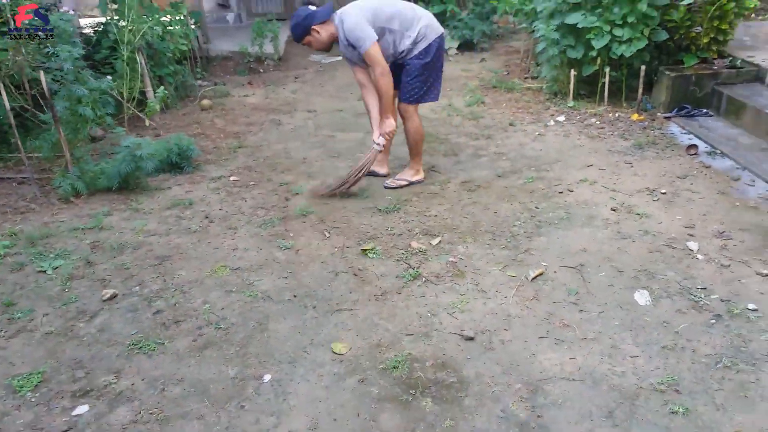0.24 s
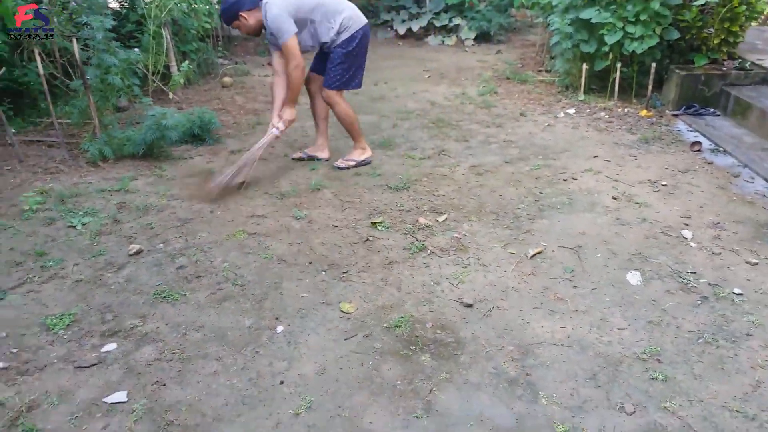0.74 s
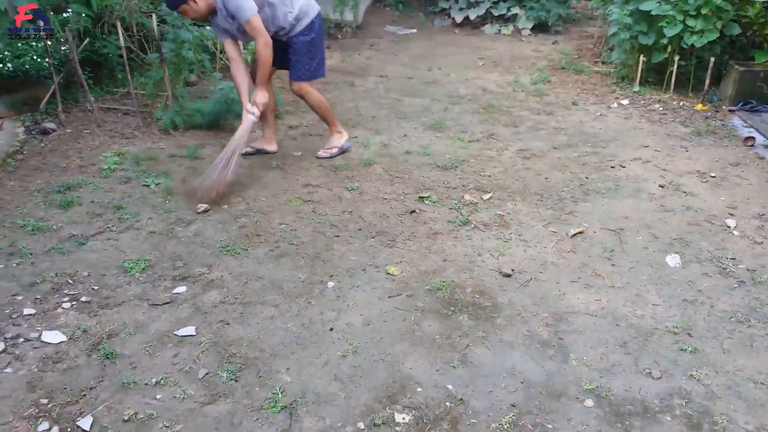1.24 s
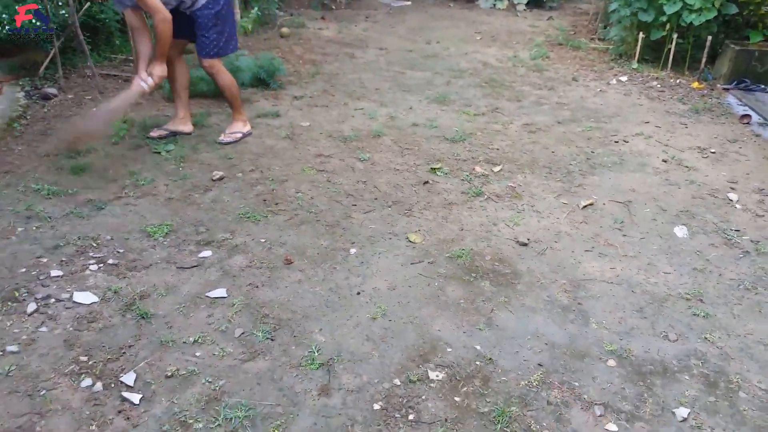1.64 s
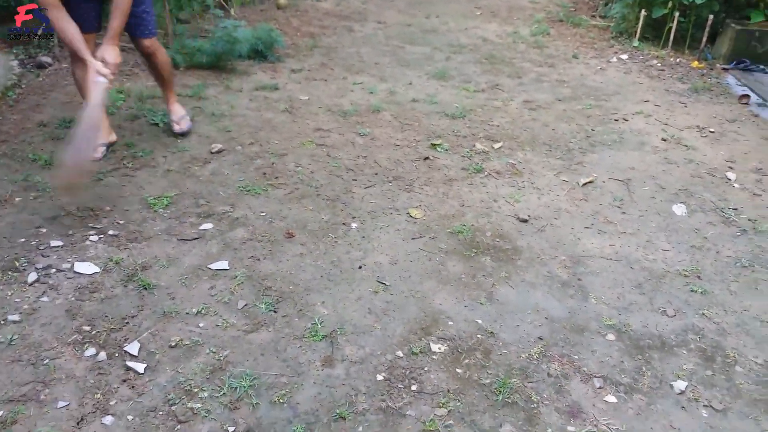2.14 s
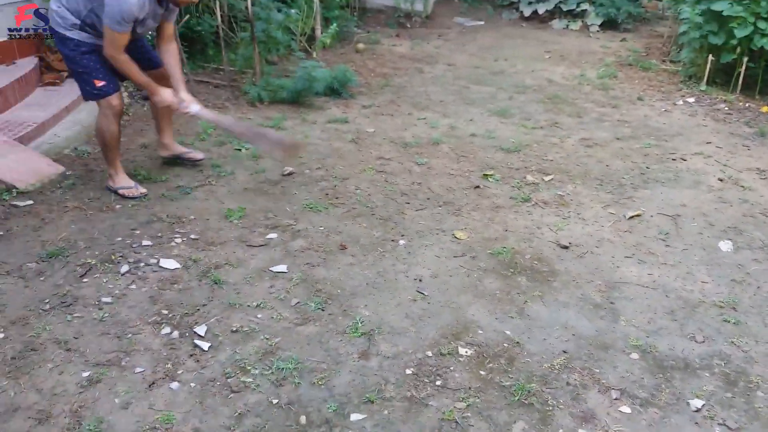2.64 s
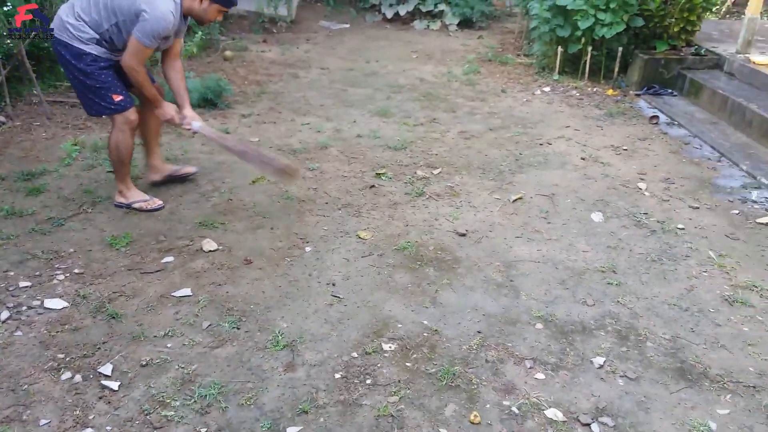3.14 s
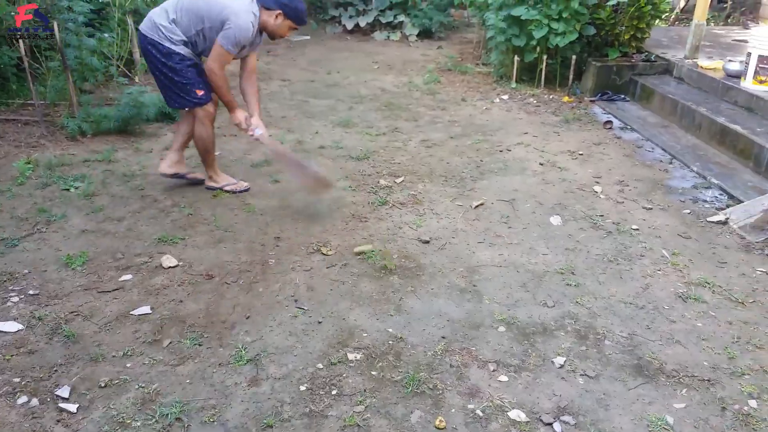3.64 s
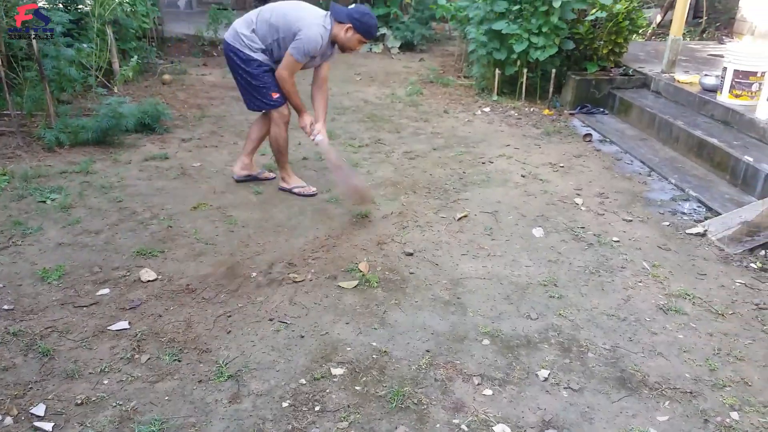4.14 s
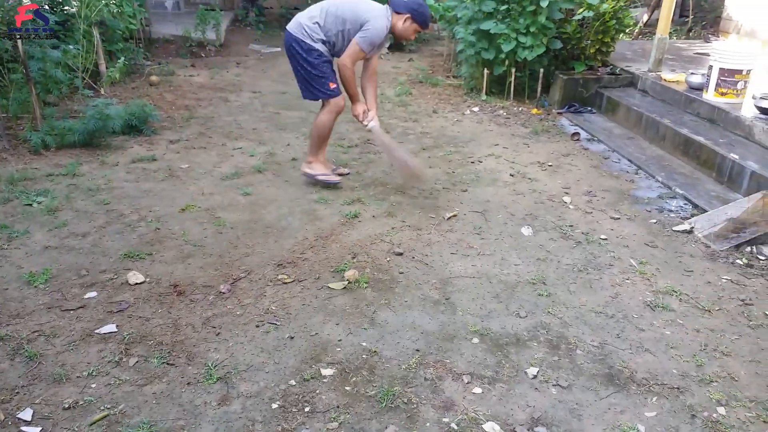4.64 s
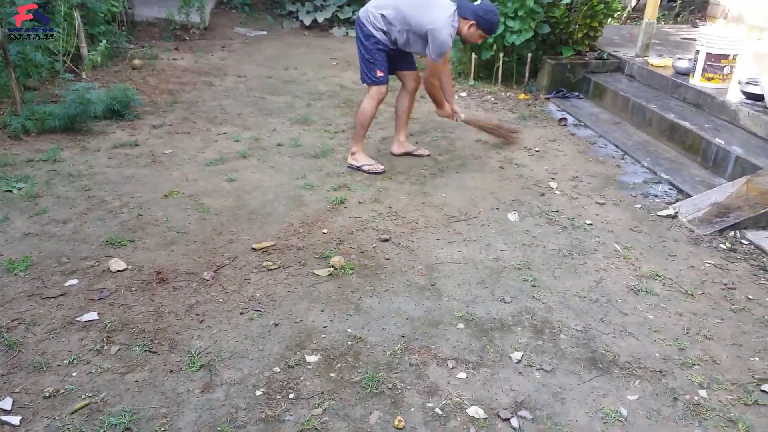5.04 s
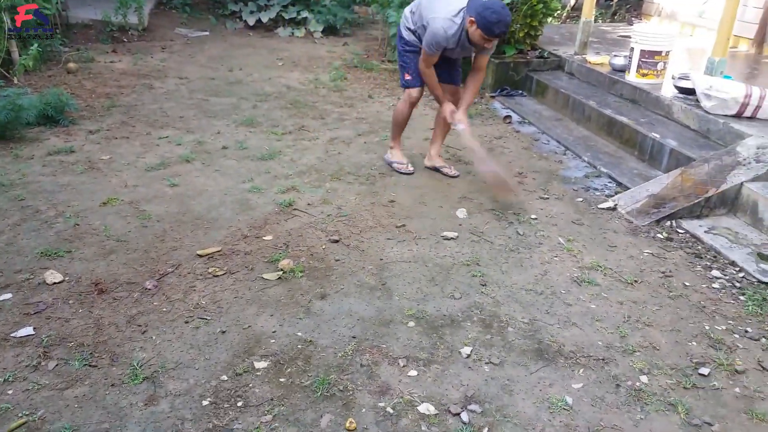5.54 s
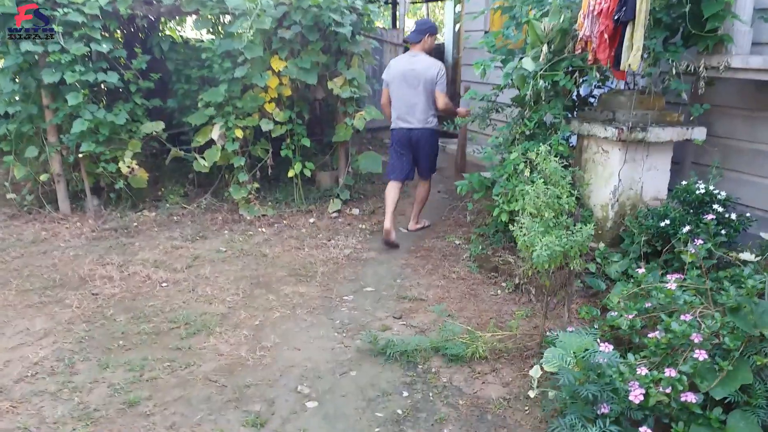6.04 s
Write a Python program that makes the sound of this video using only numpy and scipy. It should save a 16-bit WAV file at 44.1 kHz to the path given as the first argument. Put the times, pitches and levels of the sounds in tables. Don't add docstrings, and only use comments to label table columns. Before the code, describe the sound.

Outdoors in a dirt yard, a stiff twig broom sweeps in rapid, time-lapsed strokes, about six dry scratchy swishes each second, chopped into tiny jittery slices that flip between left and right. Small stones click and ring, a few dull knocks and footfalls thud. Faint traffic rumble and insects lie beneath. Near the end the sweeping stops dead, leaving quiet air and insect song.

```python
import sys
import numpy as np
from scipy import signal
from scipy.fft import rfft, irfft, next_fast_len
from scipy.io import wavfile
from scipy.ndimage import uniform_filter1d

SR = 44100
rng = np.random.default_rng(int(sys.argv[2]) if len(sys.argv) > 2 else 0)


def how_loud(loudness_db):
    steps = np.asarray(loudness_db, float) / 20
    return 10 ** steps


def wrap_up_sound(samples):
    columns = np.atleast_2d(samples).T
    tamed = np.clip(columns, -1, 1)
    steps = np.round(tamed * 32767).astype(np.int16)
    wavfile.write(sys.argv[1], SR, steps)


N = 276948

SLICE_S, FIRST_CUT_S = 1508.3 / SR, 140 / SR


def in_time(rows):
    return np.interp(np.arange(N) / SR, *np.transpose(rows))


def butter(x, order, hz, kind="low"):
    return signal.sosfilt(signal.butter(order, hz, kind, fs=SR, output="sos"), x)


def colour(x, points):
    size = next_fast_len(N + 4096)
    hz, db = np.transpose(points)
    log_hz = np.log(np.maximum(np.arange(size // 2 + 1) * SR / size, 1))
    level_db = np.interp(log_hz, np.log([hz[0] / 4, *hz]), [db[0] - 14.5, *db])
    cepstrum = irfft(level_db * np.log(10) / 20, size)
    cepstrum[1:size // 2] *= 2
    cepstrum[size // 2 + 1:] = 0
    return irfft(rfft(x, size) * np.exp(rfft(cepstrum)), size)[..., :N]


def resonance(x, hz, width_hz):
    r = np.exp(-np.pi * width_hz / SR)
    zeros = [(1 - r * r) / 2, 0, (r * r - 1) / 2]
    poles = [1, -2 * r * np.cos(2 * np.pi * hz / SR), r * r]
    return signal.lfilter(zeros, poles, x)


def rms_one(x):
    return x / np.sqrt(np.mean(x ** 2) + 1e-20)


def drift(rate_hz):
    r = np.exp(-2 * np.pi * rate_hz / SR)
    noise = rng.standard_normal(N + 9000)
    return rms_one(signal.lfilter([1], [1, -2 * r, r * r], noise)[9000:])


def slice_place():
    return np.maximum(np.arange(N) / SR - FIRST_CUT_S, 0) / SLICE_S


def near_is_left():
    swaps_per_slice = .42475
    k = slice_place().astype(int)
    return (np.floor(k * swaps_per_slice + .034) % 2 == 1) | (k > 168)


def swing(t):
    # sticks land in s, drag lasts in s,
    # strength in dB, thrown dust in dB, bundle turned side-on in dB
    strokes = [(-0.042, 0.13, -21, -51, 4.1), (0.137, 0.12, -21.5, -37.9, 5.5),
               (0.319, 0.087, -19, -44.2, 6.0), (0.48, 0.065, -20, -34, 4.5),
               (0.631, 0.075, -18.5, -38.5, 0.5), (0.791, 0.081, -18.5, -33, 4.5),
               (0.957, 0.092, -16, -41, 2.5), (1.123, 0.059, -14.5, -36, 3),
               (1.287, 0.07, -16.8, -30.5, 3.5), (1.464, 0.079, -17, -41, 2.7),
               (1.649, 0.096, -19.0, -44, 2.5), (1.823, 0.073, -18, -43, 3.5),
               (1.987, 0.084, -18.6, -53.5, 2.5), (2.157, 0.066, -17.5, -58, 0.5),
               (2.305, 0.042, -20, -38.7, 1), (2.467, 0.1, -19, -41, 0.5),
                 (2.643, 0.064, -16.5, -34.5, 1.7), (2.791, 0.061, -15.5, -39.5, 1.8),
                 (2.96, 0.088, -22.5, -32.2, 3), (3.131, 0.067, -19.5, -36.5, 3.5),
                 (3.308, 0.087, -22.5, -41, 3.5), (3.476, 0.071, -22, -40.5, 0.7),
                 (3.631, 0.081, -22, -36.5, 2.5), (3.799, 0.087, -18.5, -34.4, 1),
                 (3.983, 0.062, -19.5, -35.5, 3), (4.143, 0.084, -21, -35.5, 5),
                 (4.33, 0.069, -21, -38, 5.2), (4.502, 0.063, -21.5, -35, 4.5),
                 (4.664, 0.072, -22.5, -42, 4.3), (4.818, 0.06, -17.5, -35.5, 5),
                 (4.988, 0.069, -22.5, -36, 6.5), (5.157, 0.066, -21.5, -39.5, 3.9),
                 (5.328, 0.07, -19, -37, 4.0), (5.512, 0.049, -16, -36.5, 4),
                 (5.706, 0.064, -18.5, -36.5, 2)]
    land_db_per_s, lift_db_per_s = 1313, 598
    arch_db, crest = 20.5, 0.43
    dust_lag_s, dust_rise_db_per_s, dust_fall_db_per_s = .034, 478, 196
    power, turn = np.full(len(t), 1e-9), np.zeros(len(t))
    for land, drag, strength_db, dust_db, turn_db in strokes:
        lift = land + drag
        sticks_db = strength_db - arch_db * ((np.clip(t, land, lift) - land) / drag - crest) ** 2
        sticks_db -= land_db_per_s * np.maximum(land - t, 0)
        sticks_db -= lift_db_per_s * np.maximum(t - lift, 0)
        after = t - lift - dust_lag_s
        fall_db = dust_fall_db_per_s * np.maximum(after, 0)
        rise_db = dust_rise_db_per_s * np.minimum(after, 0)
        power += how_loud(sticks_db) ** 2 + how_loud(dust_db - fall_db + rise_db) ** 2
        turn[t > land - SLICE_S] = turn_db
    return 10 * np.log10(power), turn


def clicks(per_s, spread_db):
    size_db = spread_db * np.minimum(rng.exponential(1, (3, N)), 4)
    sizes = how_loud(size_db) * rng.choice([-1, 1], (3, N))
    return rms_one(sizes * (rng.random((3, N)) < per_s / SR))


def patchy(x, held_db, moving_db):
    k = slice_place().astype(int)
    edges_hz = 400 * 2 ** np.arange(0, 5.6, 1 / 3)
    out = 0
    for i, (low, high) in enumerate(zip(edges_hz, edges_hz[1:])):
        held = held_db * rng.standard_normal(k[-1] + 1)[k]
        gain = how_loud(held + moving_db * drift(57))
        out = out + gain * butter(x, 2, [low, high], "band") * (-1) ** i
    return out


def broom(clump_db=0.27, snap_db=-7):
    # frequency in Hz, level in dB
    near_port = [(600, -9), (1000, -3.5), (1400, 0.34), (1700, 5.5), (2000, 6), (2600, 9.5), (3000, 9),
                 (4000, 17), (4500, 19), (5200, 11.5), (6300, 1.46), (7500, 1), (9000, -14), (15500, -33.5)]
    # frequency in Hz, level in dB
    far_port = [(600, -9.5), (1000, -4), (1400, -6.5), (1800, -3), (2300, -6), (2800, -6), (4000, -14),
                (5200, -20.5), (7000, -18.5), (9000, -26.5), (15500, -29)]
    # time in s, level in dB
    sheen = [(0, 1.5), (2, 1), (3.5, 3), (5.3, 3), (5.6, 7.5)]
    kept = 0.16
    fade_lag_s = 0.0025
    last_slice = 170
    far_db, far_follows, sheen_follows = -.5, 0.49, 0.41

    place = np.maximum(slice_place() - fade_lag_s / SLICE_S, 0)[::8]
    moment = np.floor(place) + .5 + kept * (place % 1 - .5)
    motion = swing(FIRST_CUT_S + fade_lag_s + moment * SLICE_S)
    level_db, body_db = np.repeat(motion, 8, axis=1)[:, :N]
    level_db[np.repeat(place, 8)[:N] >= last_slice] = -90

    slips = clicks(9000.0, spread_db=3.0) * how_loud(clump_db * drift(186))
    slips = slips + how_loud(snap_db) * clicks(350.0, spread_db=1.5)
    own = butter(slips[1:], 1, 1200, "high")
    near, far = patchy(0.58 * slips[0] + own, held_db=1.03, moving_db=1.45)
    ports = np.array([colour(near, near_port), colour(far, far_port)])
    ports /= np.std(ports[0])
    ports[0] += (how_loud(body_db) - 1) * butter(ports[0], 2, 2000)
    ports[1] *= how_loud(far_db + far_follows * body_db)
    sheen_db = in_time(sheen) + sheen_follows * body_db
    top = signal.sosfiltfilt(signal.butter(3, 8300, "high", fs=SR, output="sos"), ports)
    ports += (how_loud(sheen_db) - 1) * top
    ports *= uniform_filter1d(np.where(near_is_left(), 1., -1.), size=3)
    return uniform_filter1d(how_loud(level_db + 0.5), size=200) * ports


def yard():
    # time in s, level in dB
    rumble_level = [(0, -51), (.4, -53.5), (1.3, -50.5), (3.2, -52.5), (4.2, -50.5), (6.28, -52)]
    # frequency in Hz, density in dB per Hz
    traffic = [(15, -34), (25, -6), (44, -7.5), (102, 0.5), (195, -3.5), (372, -4.5), (600, -15.5),
               (900, -15), (1170, -41), (1980, -120)]
    # frequency in Hz, level in dB
    air_near = [(500, -8.5), (1000, -10), (2000, -11), (3000, -11.5), (4200, -6), (5500, -24),
                (7000, -18.5), (9000, -29), (15500, -27.5)]
    # frequency in Hz, level in dB
    air_far = [(500, -16.5), (1000, -12.5), (2000, -14.5), (3000, -13.5), (4200, -24), (5500, -22),
               (7000, -25), (9000, -26.5), (15500, -32)]
    # time in s, level in dB
    air_level = [(0, -45), (1, -44), (2, -47), (5, -48), (6.28, -46.5)]
    # start in s, end in s, centre in Hz, width in Hz, level in dB
    insects = [
        (-.1, 5.82, 8230, 220, -57),
        (5.82, 6.4, 8250, 180, -63.5),
        (5.84, 6.4, 9800, 1800, -68),
        (.42, .51, 9750, 500, -59),
        (.925, 1.05, 9750, 500, -58),
        (1.71, 1.73, 9750, 500, -60),
        (6.1, 6.4, 4154, 660, -52.5),
        (6.14, 6.4, 4770, 300, -57),
        (6.17, 6.4, 3250, 250, -60),
    ]
    song_edge_db_per_s, insect_far_db = 600, -12

    common, own = rng.standard_normal(N), rng.standard_normal((2, N))
    rumble = rms_one(colour(common + .7 * own, traffic + [(2500, -70)]))
    rumble *= how_loud(in_time(rumble_level) + 1.3 * drift(10))
    hiss = rng.standard_normal((2, N))
    air = np.array([colour(hiss[0], air_near), colour(hiss[1], air_far)])
    air *= how_loud(in_time(air_level) + 12 + .8 * drift(12))
    out = rumble + air
    t = np.arange(N) / SR
    for start, end, hz, width_hz, db in insects:
        band = resonance(resonance(rng.standard_normal((2, N)), hz, width_hz), hz, width_hz)
        outside_s = np.maximum(np.maximum(start - t, t - end), 0)
        song_db = db - song_edge_db_per_s * outside_s + 1.4 * drift(33)
        out += rms_one(band) * how_loud(song_db) * how_loud([[0], [insect_far_db]])
    return out


def motor():
    # time in s, level in dB
    hum = [(0, -59), (1.3, -60.5), (1.4, -93)]
    tone = resonance(resonance(rng.standard_normal(N), 388, 25), 388, 25)
    return rms_one(tone) * how_loud(in_time(hum))


def bird():
    # start in s, length in s, start pitch in Hz, end pitch in Hz, level in dB
    chirps = [
        (1.068, .034, 3700, 2850, -36),
        (5.581, .033, 7050, 6850, -41),
        (.452, .032, 1780, 1780, -45),
        (.42, .03, 1770, 1770, -52),
    ]
    out = np.zeros(N)
    for s, length, hz, end_hz, db in chirps:
        t = np.arange(round(length * SR)) / SR
        flutter = 1 + 0.2 * np.sin(2 * np.pi * 190 * t)
        mean_hz = hz + (end_hz - hz) * t / length / 2
        out[round(s * SR):][:len(t)] += how_loud(db) * flutter * np.sin(2 * np.pi * mean_hz * t)
    return out * (1 + .5 * drift(400)) * how_loud([[0], [-10]])


def pebbles():
    # time in s, peak in dB, ring in Hz, broad crack in dB
    grit = [(.594, -20, 3750, -23), (1.0441, -17, 4390, -15), (1.054, -10.5, 4380, -28),
            (1.401, -28.5, 955, -2), (2.956, -15.5, 4730, -15), (3.298, -26, 4740, -14),
            (3.3637, -2, 4430, -19), (3.373, -22, 4600, -14), (3.906, -14, 2650, -3),
            (4.2316, -18.5, 2700, 1.5), (4.244, -23, 2900, -14), (4.404, -19, 2700, -8),
            (4.467, -22, 4565, -6), (4.577, -15.5, 3700, -10), (4.5958, -21, 3700, -16),
            (4.602, -32, 1100, 17), (4.738, -21.5, 2690, 1), (.775, -35, 4110, -12),
            (1.768, -35, 4600, -14), (2.62, -34, 4820, -14), (3.264, -30, 4590, -14)]
    ring_width_hz = 470
    out = np.zeros(N)
    for s, db, hz, crack_db in grit:
        at, click = round(s * SR), np.zeros(900)
        click[:150] = rng.standard_normal(150) * np.exp(-np.arange(150) / 20)
        ring = resonance(resonance(click, hz, ring_width_hz), hz, 1.9 * ring_width_hz)
        crack = butter(click, 3, [500, 5500], "band")
        crack = butter(crack, 3, 6500)
        ring /= np.abs(ring).max()
        crack /= np.abs(crack).max()
        out[at:at + 900] += how_loud(db) * (ring + how_loud(crack_db) * crack)
    return out * how_loud([[0], [-14]])


def thumps():
    # time in s, level in dB, pitch in Hz, 60 dB decay in s, length in s
    knocks = [(1.55, -24.5, 310, 0.091, 0.022), (1.555, -29.5, 185, .15, 0.024),
              (1.58, -42, 323, 0.34, .03), (1.553, -41, 450, .1, .028), (1.606, -43, 500, .1, .03),
              (1.605, -45, 720, .1, .02), (1.555, -44, 650, .08, .02), (1.603, -33, 327, .4, 0.04),
              (1.604, -45, 215, 0.45, 0.041), (1.604, -43.5, 470, 0.25, 0.038),
              (1.792, -40, 125, .3, 0.024), (4.01, -33, 68, 0.33, 0.0345), (4.057, -39, 71, .4, 0.061),
              (1.241, -41.5, 78, .3, 0.033), (5.047, -24.5, 600, 0.019, .03),
              (5.516, -41.5, 254, 0.17, 0.0385), (5.74, -48, 460, 0.22, 0.044), (5.96, -48.5, 80, 2.1, 0.3)]
    out = np.zeros(N)
    for s, db, hz, t60, length in knocks:
        t = np.arange(round(length * SR)) / SR
        edge = np.clip(np.minimum(t, length - t) / 0.0043, 0, 1)
        out[round(s * SR):][:len(t)] += how_loud(db - 60 * t / t60) * edge * np.sin(2 * np.pi * hz * t)
    return out


def scene():
    return broom() + yard() + motor() + bird() + pebbles() + thumps()


def band_limit(x):
    return signal.sosfilt(signal.butter(12, 16480, fs=SR, output="sos"), x)


def record(dry):
    near_left = uniform_filter1d(near_is_left() * 1., size=12)
    band = signal.sosfilt(signal.cheby2(14, 45, 16100, fs=SR, output="sos"), dry)
    swapped = near_left * band + (1 - near_left) * band[::-1]
    mix = butter(swapped, 2, 35, "high") - .0013
    return band_limit(mix)


dry = scene()
out = record(dry)
wrap_up_sound(out)
```